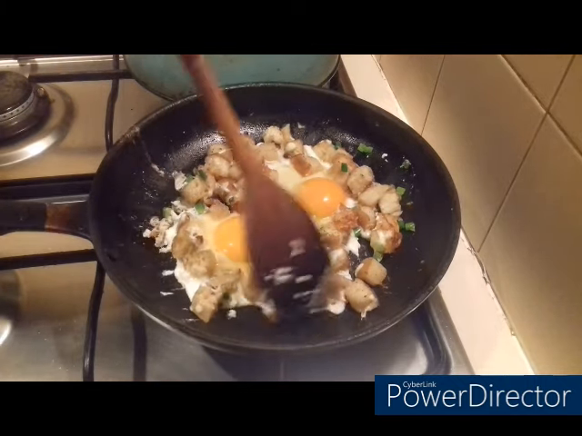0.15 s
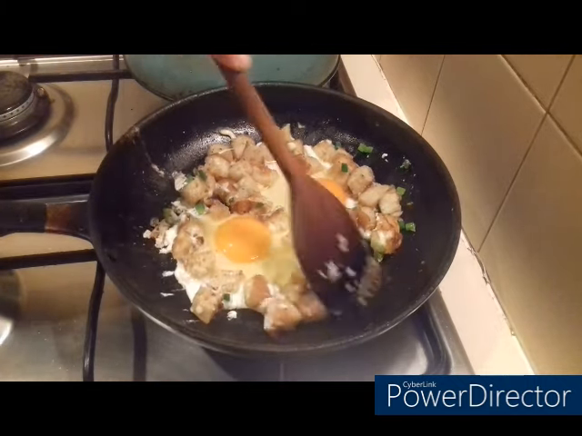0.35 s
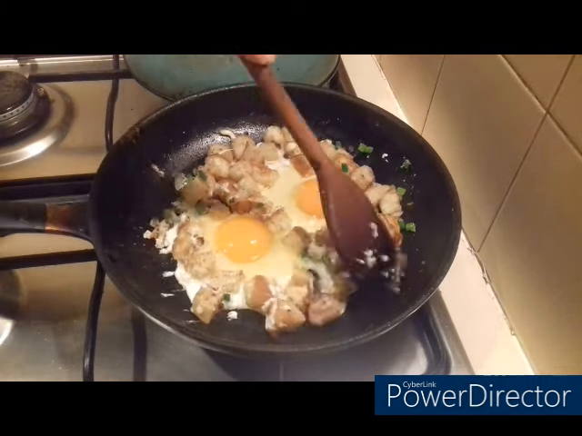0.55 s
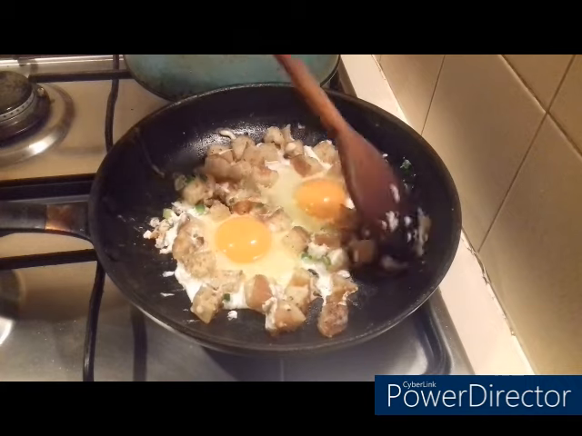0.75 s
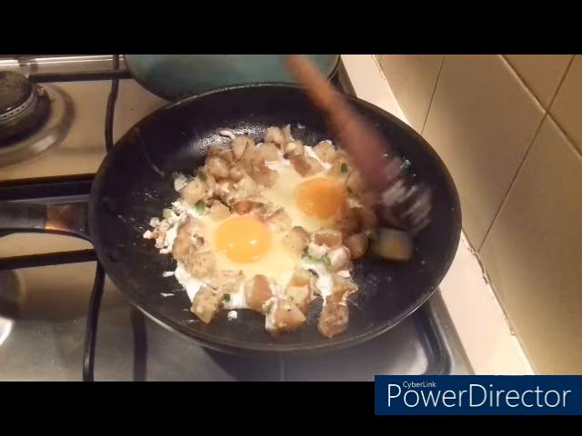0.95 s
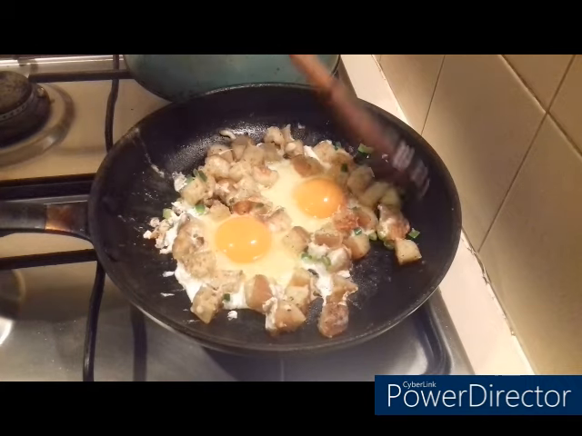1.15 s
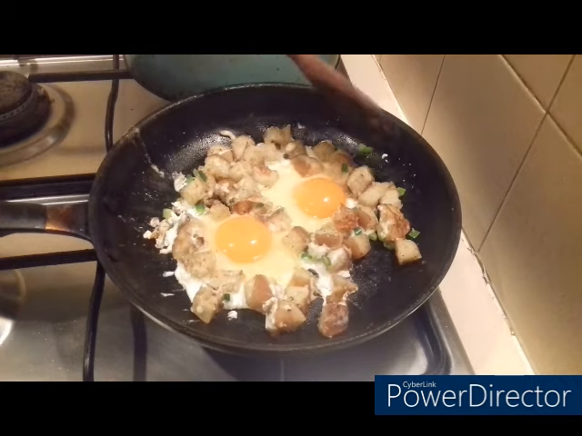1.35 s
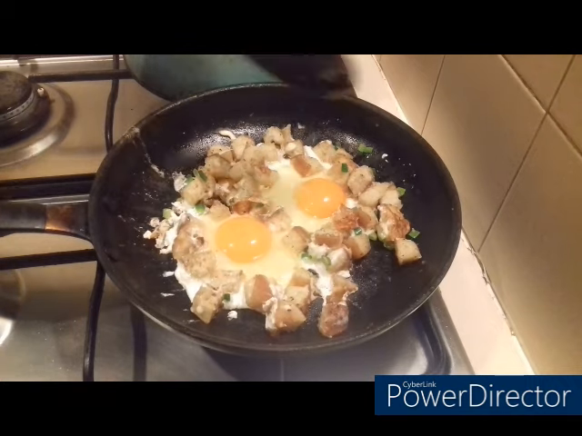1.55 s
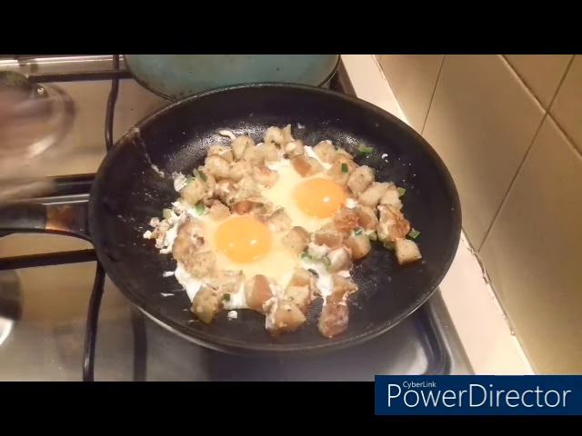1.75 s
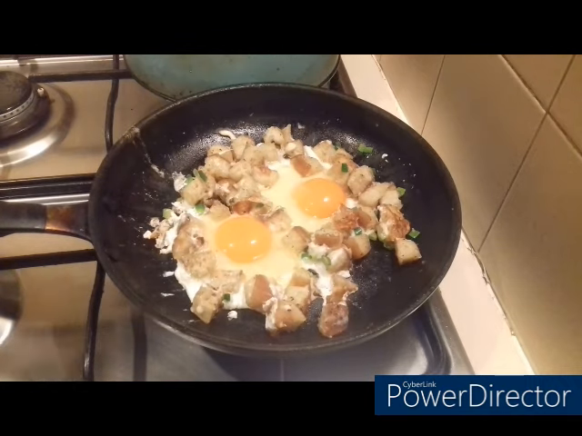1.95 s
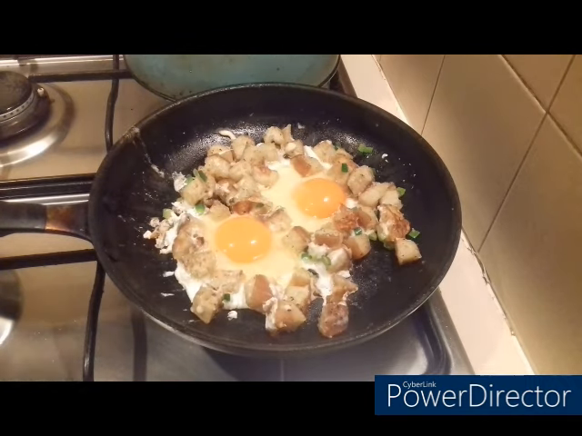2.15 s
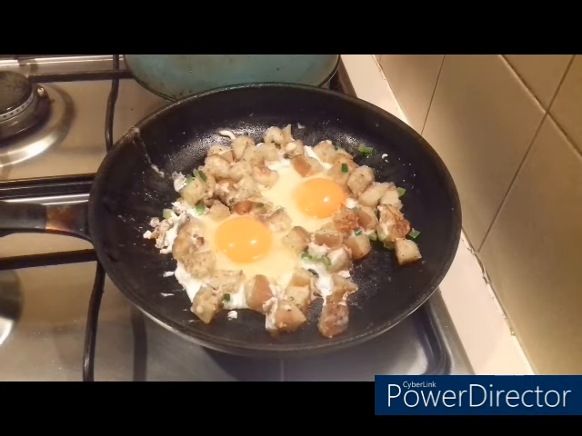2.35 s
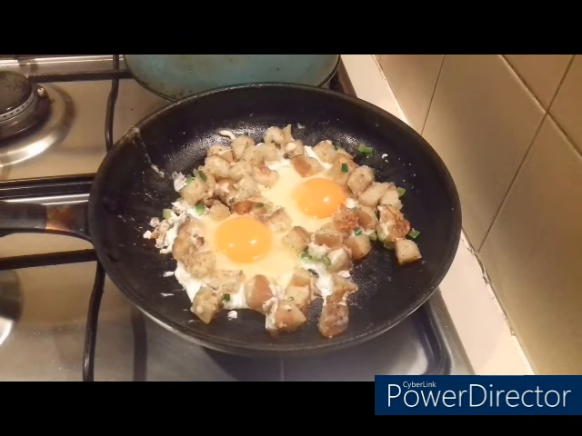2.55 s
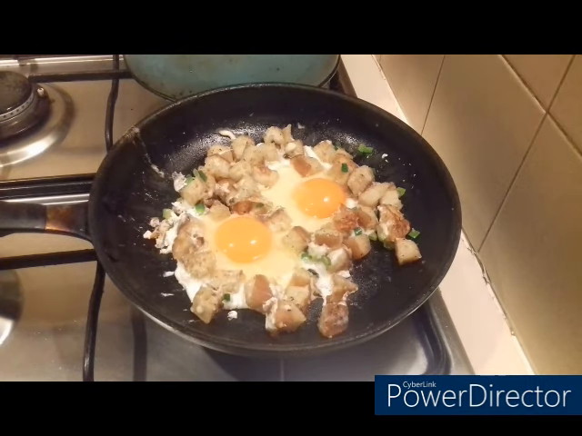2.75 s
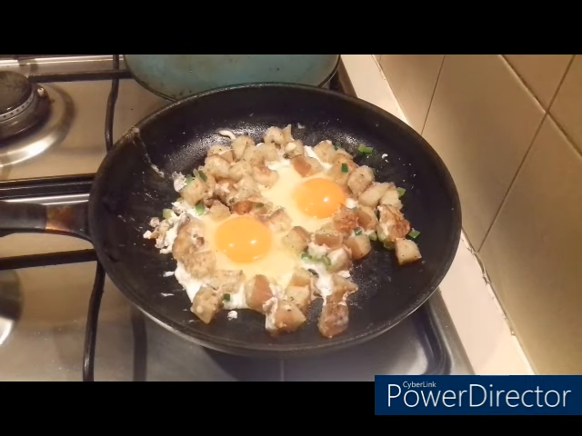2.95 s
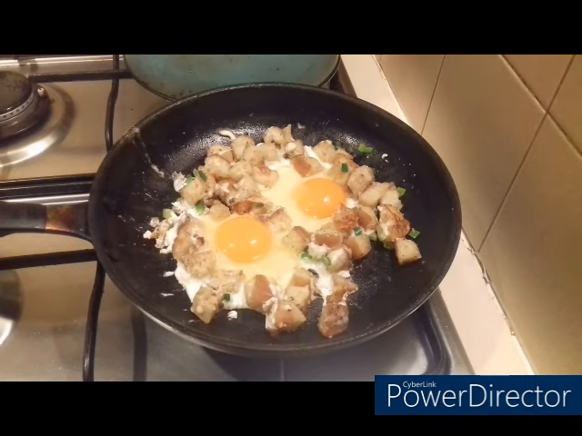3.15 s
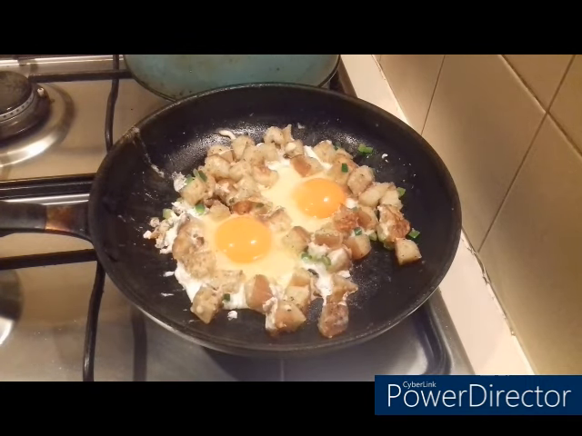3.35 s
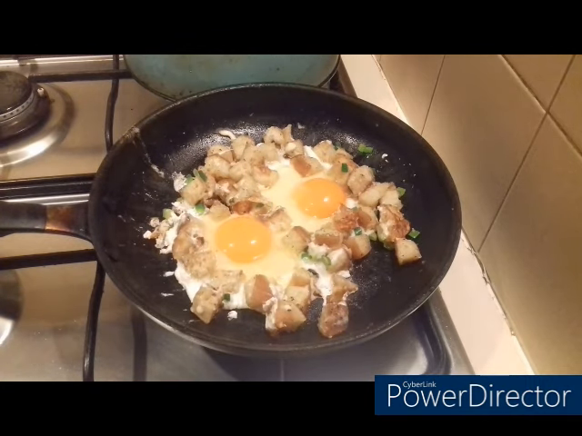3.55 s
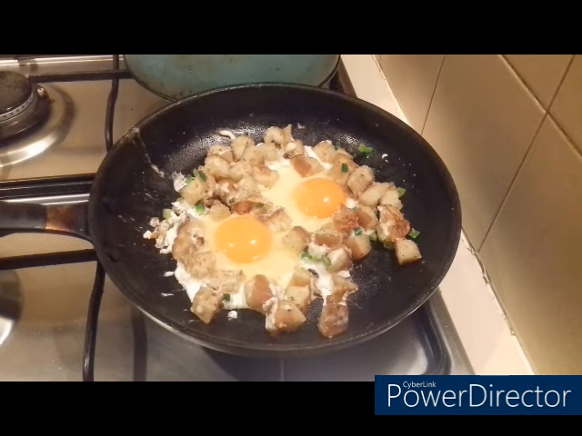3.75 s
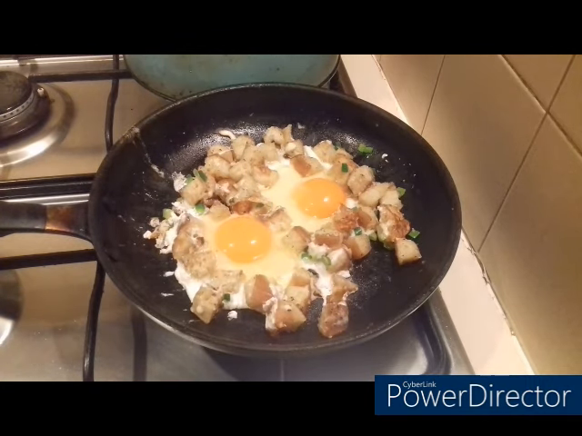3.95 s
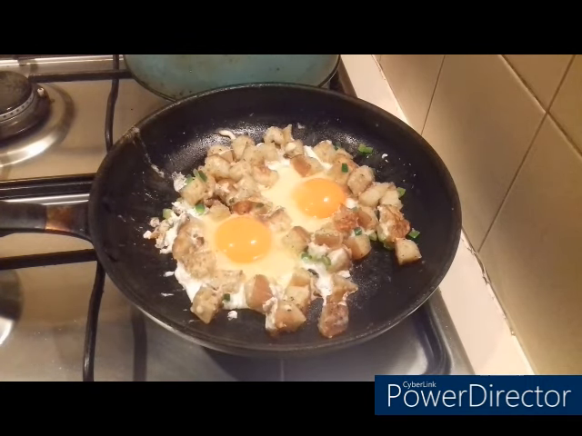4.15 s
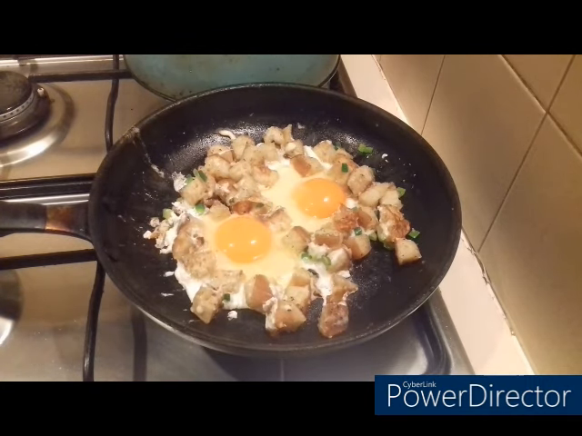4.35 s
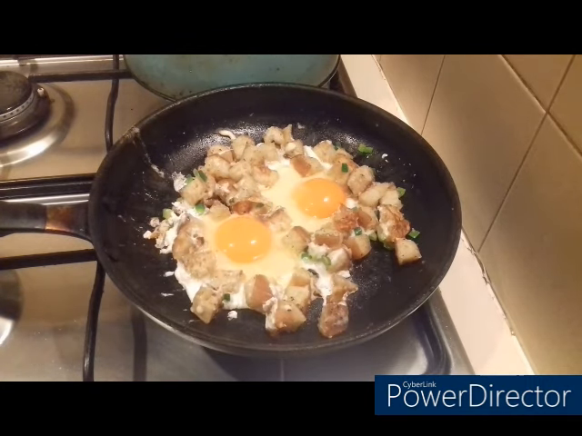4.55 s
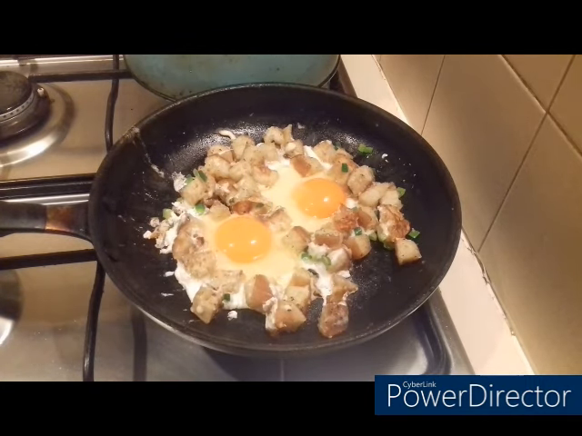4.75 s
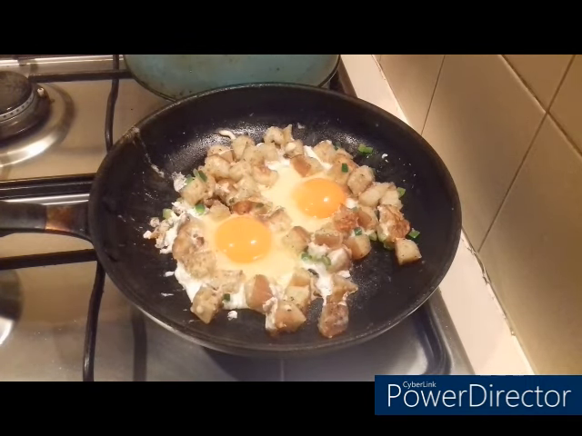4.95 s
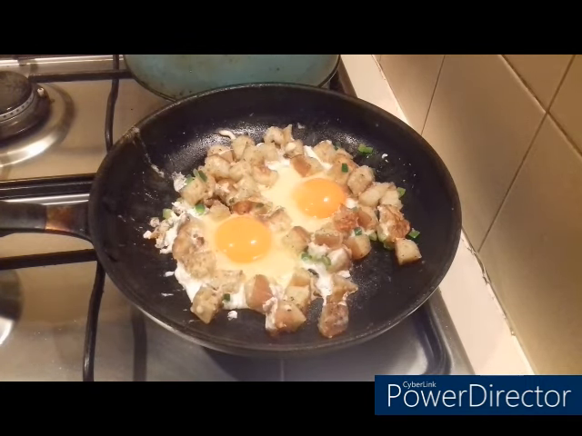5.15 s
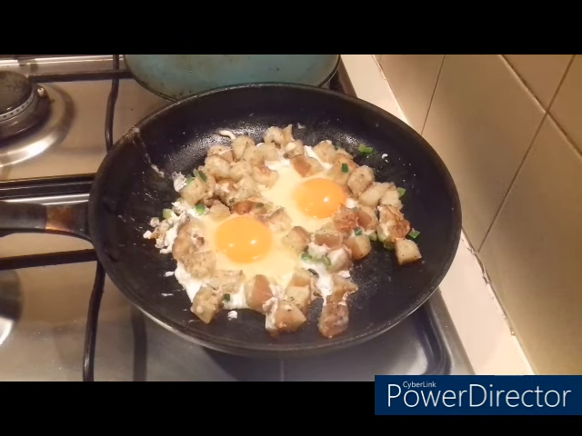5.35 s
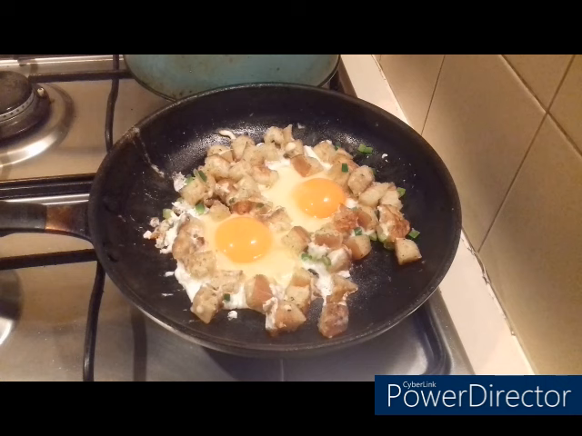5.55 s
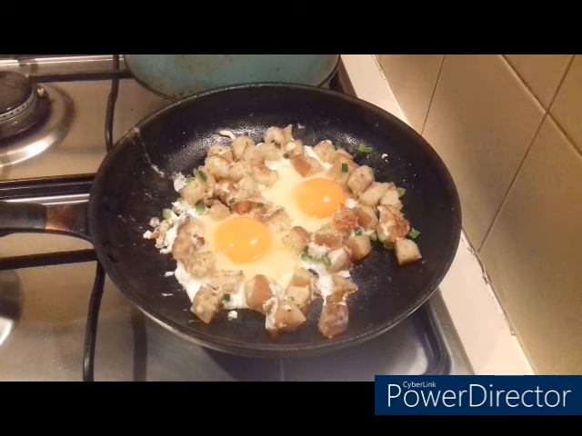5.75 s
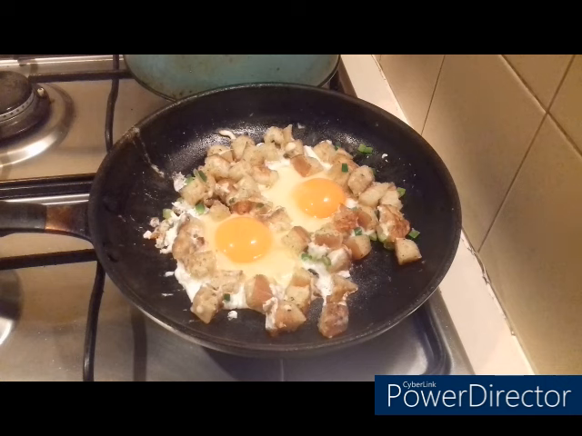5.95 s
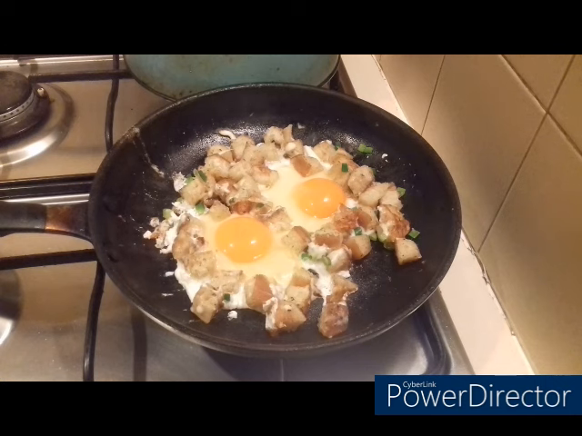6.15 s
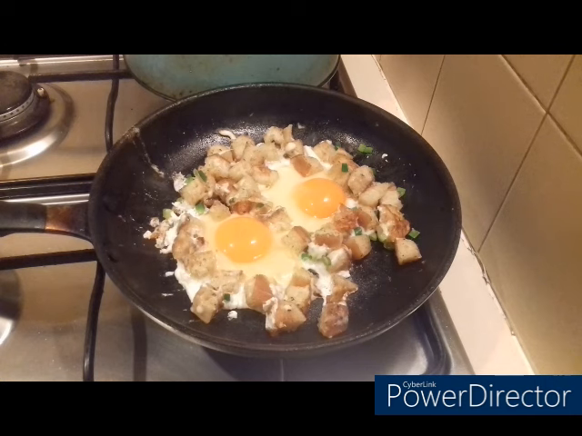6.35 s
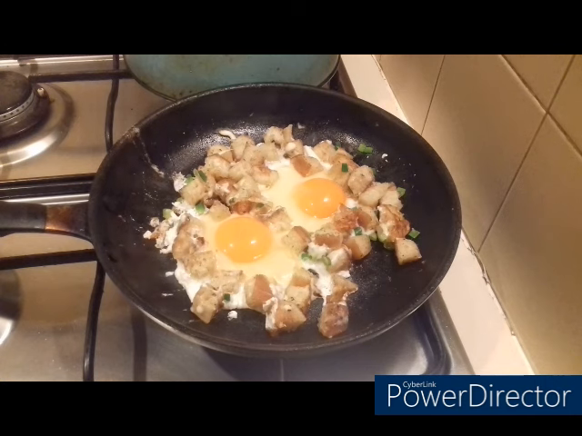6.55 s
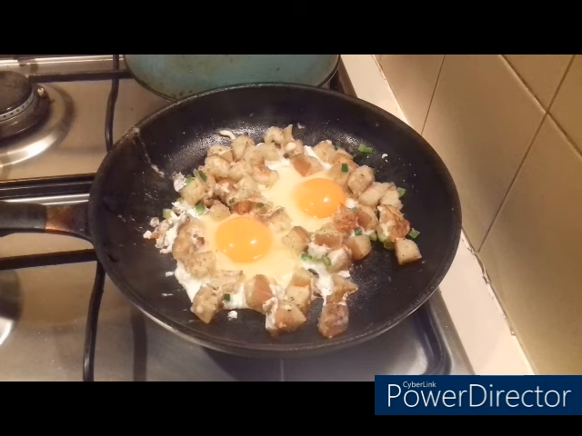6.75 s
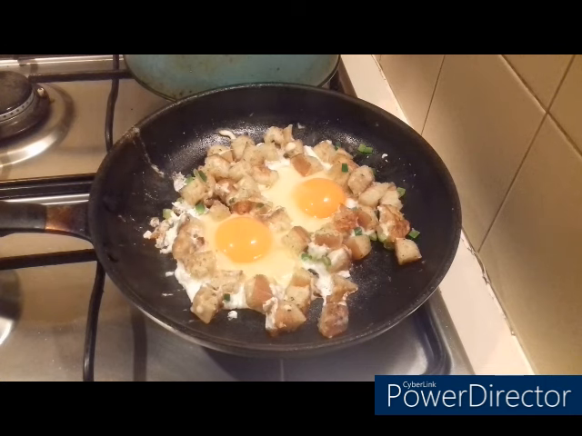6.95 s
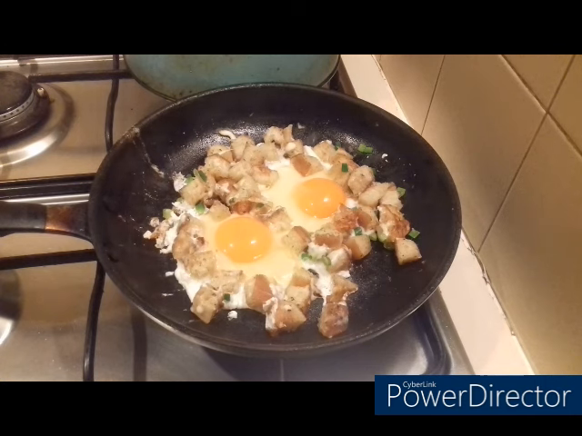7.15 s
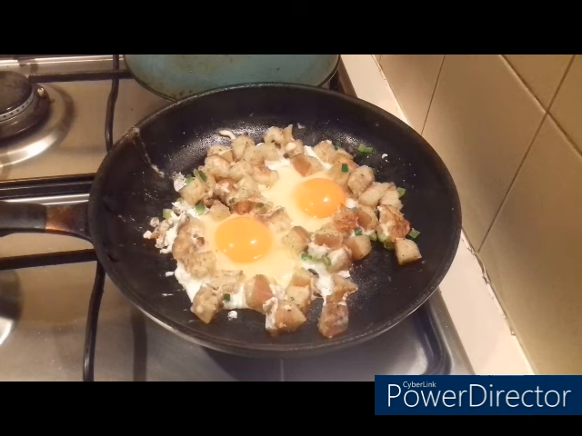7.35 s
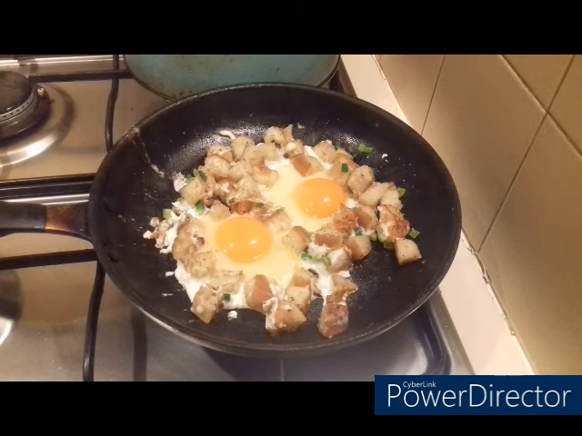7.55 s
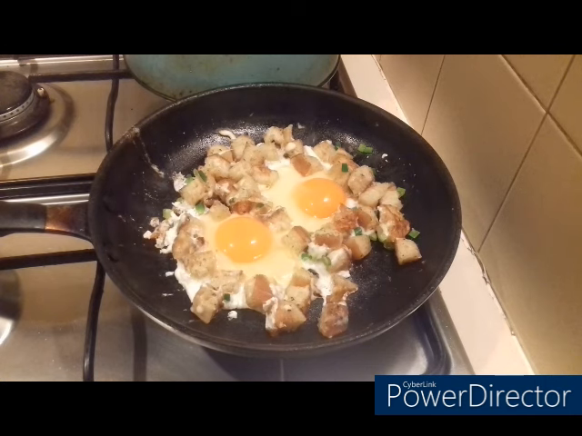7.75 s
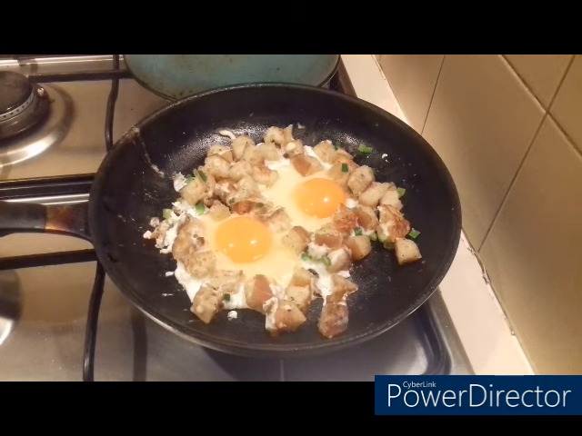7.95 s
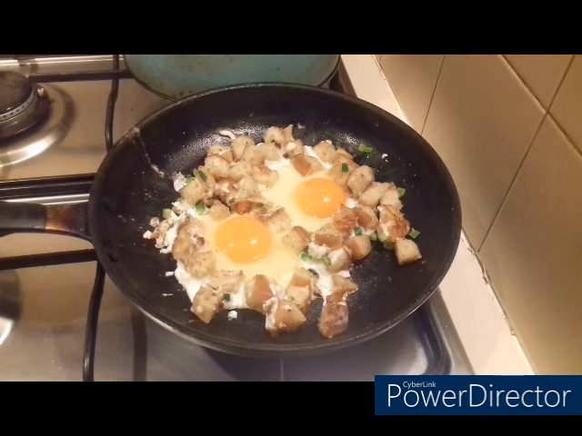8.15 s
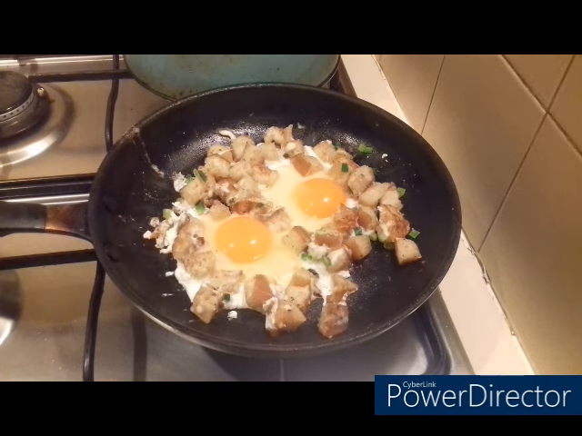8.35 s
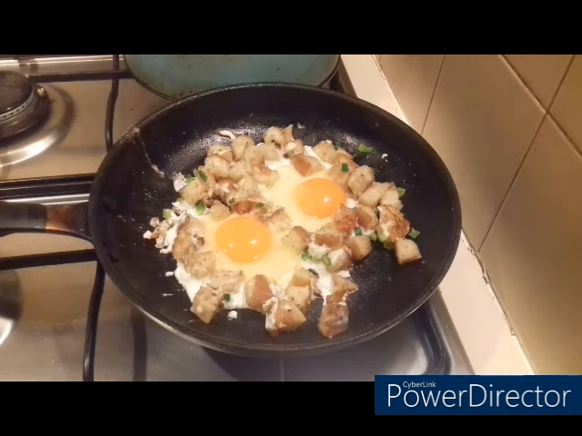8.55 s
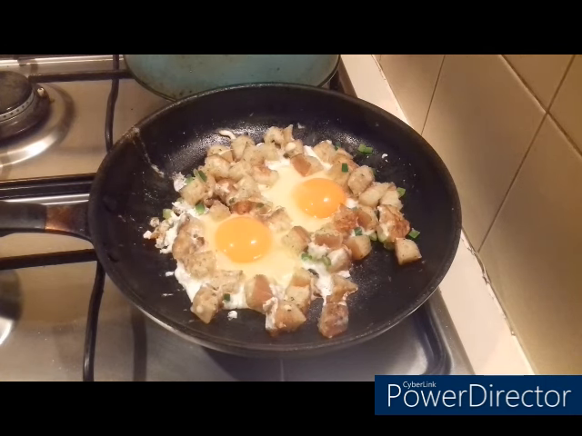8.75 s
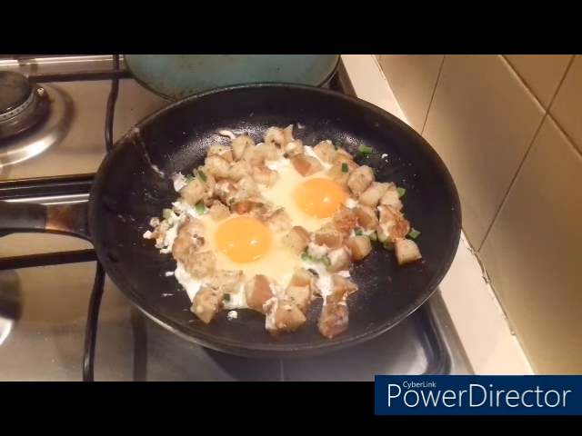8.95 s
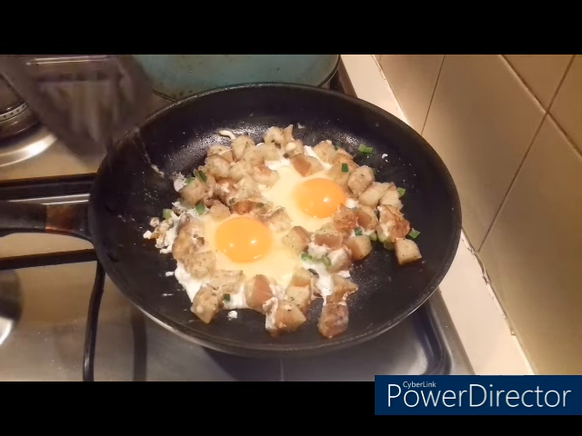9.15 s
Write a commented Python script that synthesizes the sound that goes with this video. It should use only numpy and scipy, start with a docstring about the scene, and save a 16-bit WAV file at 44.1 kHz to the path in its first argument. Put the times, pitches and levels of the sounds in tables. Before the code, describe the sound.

Eggs fry in a pan close to the microphone, giving a constant fine hiss and dense, irregular crackle of bursting bubbles. From 0.06 to about 1.1 s a wooden spatula raps the pan rim in quick, loud clusters roughly every quarter second, with lighter ticks between; the strongest comes near 0.34 s and the last are weaker. From 1.4 to 5.4 s sharp spits of fat pop over the sizzle, thickest around 2.5 to 3.8 s. At 5.65 s a hollow click starts utensil handling: very loud clicks near 5.9 s, short woody drags, then heavier metallic clanks at 6.6, 6.9 and 7.15 s, a click at 7.4 s and a softer rattle around 7.7 to 7.85 s. Sizzling continues alone, with a few spits from 8.6 to 9 s and a faint tick near 9.05 s. Low hum and faint hiss lie underneath; the small hard kitchen adds a short tail.

```python
"""Eggs fry in a pan on a gas hob, close to a small microphone: bursting bubbles crackle over a fine hiss.
In the first second a wooden spatula is knocked clean on the rim, each knock a burst ringing rim or edge.
Loud spits of fat, short noise bursts, follow until about 5.4 s; a few more come after 8.5 s.
From 5.6 s utensils click, ring, drag and rattle beside the hob, made of impacts, resonances and slips.
A small hard-walled kitchen adds a short tail to the knocks; a low hum and a faint hiss stay throughout."""
import sys
import numpy as np
from scipy import signal
from scipy.fft import rfft, irfft
from scipy.io import wavfile
from scipy.ndimage import uniform_filter1d

SR = 44100
rng = np.random.default_rng(int(sys.argv[2]) if len(sys.argv) > 2 else 0)


def output_pcm(signal):
    """Save a mono or channel-first signal as 16-bit PCM at the path in sys.argv[1].

    Samples are clipped to [-1, 1] before scaling.
    """
    pcm = np.clip(np.atleast_2d(signal).T, -1, 1) * 32767
    wavfile.write(sys.argv[1], SR, np.round(pcm).astype(np.int16))


N = 409688

# Every COLOUR is a smooth spectrum: (frequency [Hz], relative density [dB per Hz])
# Every MODES table holds resonances on it: (frequency [Hz], width [Hz], relative density [dB per Hz])

# Frying without the loud spits: (time [s], level [dB])
FRYING_LEVEL = [(0.0, -44), (0.6, -46), (2.1, -46), (2.51, -43.5), (2.85, -45.5), (3.52, -44.5),
                (4.94, -45.5), (5.46, -44), (5.92, -46.5), (6.65, -45.5), (7.5, -46.5), (9.29, -47.5)]
# Frying as the pan and microphone pass it on: (frequency [Hz], relative density [dB per Hz])
PAN_COLOUR = [(410, -42), (700, -13.5), (874, -10), (957, 1), (1210, -12), (1740, -4.5), (1890, -12.5),
              (2290, -6.5), (2420, -3.5), (4340, 0.5), (5490, -10.5), (7230, -15), (10000, -26),
              (11900, -23.5), (15800, -29)]
# Pan and microphone resonances: (frequency [Hz], width [Hz], relative density [dB per Hz])
PAN_MODES = [(970, 31, -11), (1912, 90, 9), (2114, 170, 7.5), (2427, 27, 11.5), (2730, 30, -16),
             (3740, 62, 14), (4150, 81, 11.5), (4450, 17, 17)]
# Loud spits of fat: (time [s], peak level [dB], centre frequency [Hz])
SPITS = [(1.4265, -27.5, 3250), (1.574, -35, 4200), (1.6405, -26, 4760), (1.7442, -26.5, 3650),
         (1.7787, -31, 3200), (1.815, -31.5, 3290), (2.214, -31.5, 3950), (2.311, -32, 3030),
         (2.4634, -24.5, 4800), (2.5551, -26, 4150), (2.593, -30.5, 4180), (2.744, -30, 3670),
         (2.76, -30, 2500), (2.783, -27.5, 2580), (2.9178, -30.5, 3370), (2.984, -31.5, 3260),
         (3.016, -30.5, 4250), (3.0892, -28, 3810), (3.121, -30.5, 2000), (3.182, -30.5, 4450),
         (3.2958, -25, 3860), (3.37, -29, 3670), (3.486, -32, 3020), (3.576, -31, 3070), (3.648, -29, 2880),
         (3.795, -28, 4050), (4.069, -24.5, 2900), (4.297, -27, 4190), (4.564, -30, 3560),
         (4.788, -31, 4000), (4.994, -36, 3000), (5.122, -30, 4500), (5.352, -32, 4420),
         (5.408, -27.5, 4530), (8.5739, -30.5, 2770), (8.619, -28.5, 4130), (8.694, -29.5, 3630),
         (8.9825, -32.5, 4200)]
# Centres of the bubble snaps, small bubbles higher than large ones: (frequency [Hz], ...)
BUBBLES_HZ = (1830, 2860, 4050, 6130, 7900)
# Low hum of the kitchen: (frequency [Hz], relative density [dB per Hz])
HUM_COLOUR = [(25, -25), (50, -17.5), (80, -2.5), (130, 6.5), (200, 1.5), (470, 1.5), (720, -3),
              (960, -3.5), (1300, -32), (3000, -64)]
# Faint hiss that differs between channels: (frequency [Hz], relative density [dB per Hz])
HISS_COLOUR = [(59, -41), (100, -14), (2300, -24), (3030, -38), (4070, -83), (5140, -35), (10100, -27.5),
               (15800, -31)]

# All blows: (time [s], loudest 4 ms in the 1.5-5.5 kHz band [dB], extra body [dB], extra treble [dB],
#             fade to 1/e of the force [s])
# Spatula on the pan rim, columns as for all blows
SPATULA = [(0.0591, -25.5, -6, -9, 0.015), (0.0842, -22.5, -1, 2, 0.011), (0.3276, -22, -3, 3, 0.0076),
           (0.34, -15, -3.5, -4, 0.0031), (0.3524, -21.5, -1.5, 5, 0.021), (0.5911, -20.5, 0.5, 3.5, 0.02),
           (0.6109, -26.5, 4, 7, 0.017), (0.6535, -30, -14, 11.5, 0.017), (0.857, -31.5, 5.5, 10, 0.0091),
           (0.8739, -30, 4, -17, 0.014), (1.0968, -37.5, 5.5, -1, 0.02)]
# Blade ticking back on its edge, columns as for all blows
REBOUNDS = [(0.194, -34, -22, 12, 0.0046), (0.2093, -24.5, 1.5, 3, 0.018), (0.4728, -23.5, 0.5, 1, 0.0099),
            (0.5053, -38, 6, -4, 0.02), (0.7043, -26, 4, -4, 0.0099), (0.7432, -37, -3, -3, 0.004),
            (0.9064, -33, 5.5, -2, 0.015), (0.944, -35, 6.5, -5, 0.0094)]
# Short hard clicks of small utensils, columns as for all blows
UTENSILS = [(5.656, -20.5, 6, -20, 0.0094), (5.8162, -36.5, -0.5, -5, 0.0091),
            (5.9198, -11.5, -11.5, 5, 0.0037), (5.9645, -13.5, -11, -2, 0.004),
            (5.9863, -24.5, -1, -12, 0.0025), (6.2463, -37, -1, 16, 0.005), (6.4049, -39.5, 7, 2, 0.0078),
            (6.484, -38.5, 9.5, 10, 0.015), (7.0968, -37, -10, -9, 0.0052),
            (7.3937, -16.5, 0.5, 1.5, 0.0024), (7.6764, -44, 16.5, -2, 0.017),
            (7.7172, -34, -3, -4, 0.0035), (9.0506, -32.5, -10, 7, 0.0047)]
# Heavier metal utensils rattling together, columns as for all blows
CLANKS = [(6.589, -34, -1, -15, 0.0028), (6.614, -36, -2, 0, 0.004), (6.6211, -13.5, 0.5, 2.5, 0.01),
          (6.8662, -12, -0.5, 0.5, 0.012), (7.1432, -14, -6.5, -7, 0.0061), (7.1884, -22.5, 5, 1, 0.0062),
          (7.7531, -22, -1.5, 1, 0.0074), (7.7929, -28.5, -6.5, -4, 0.0019), (7.8476, -34, -6, -7, 0.0034)]
# Bodies set ringing by the blows, columns as for every COLOUR and MODES
RIM_COLOUR = [(35, -57.5), (60, -26), (255, -3.5), (537, -10), (780, -2), (1240, -4.5), (1940, -10.5),
              (2620, -15), (4590, -14), (5400, -30), (15800, -56)]
RIM_MODES = [(257, 31, 0.5), (390, 91, -3.5), (481, 12, -7), (773, 68, 7.5), (976, 140, 4.5),
             (1260, 43, -16), (1560, 150, -16), (1904, 110, -4.5), (3140, 300, -9.5), (3300, 40, -20),
             (4450, 160, -24), (4960, 330, -44)]
EDGE_COLOUR = [(60, -44), (300, -9), (700, -35), (1500, -10), (2600, -22.5), (4000, -12), (5200, -22.5),
               (15800, -66.5)]
EDGE_MODES = [(990, 270, 3), (1450, 210, -5.5), (2074, 300, 10), (3210, 570, 8), (4450, 210, 6)]
CLICK_COLOUR = [(60, -30), (314, -33.5), (745, -35.5), (1720, -16.5), (3000, 0.5), (4200, 0), (5300, -9.5),
                (7000, -16), (10000, -46), (15800, -54)]
CLICK_MODES = [(370, 90, -17), (2000, 400, -12), (3400, 500, -4), (4200, 400, 0)]
TOOL_COLOUR = [(60, -40), (300, -16), (490, -5), (900, -37), (1500, -21), (4300, -13.5), (5600, -25),
               (8000, -16.5), (10000, -27), (13000, -23), (15800, -30)]
TOOL_MODES = [(485, 80, -2), (880, 80, -3), (1000, 80, -7), (1314, 80, -9), (1825, 130, -9),
              (2430, 130, -7), (2870, 150, -8), (3140, 150, -8), (3380, 130, -8), (3844, 150, -7),
              (4180, 130, -4), (4355, 130, -4)]
# Borders between the low, middle, high and top bands of a blow: (frequency [Hz], ...)
BAND_EDGES_HZ = (600, 1500, 5500)
# Usual balance of a blow against its high band:
# (low band [dB], middle band [dB], top band [dB], thud of the worktop [dB])
SPATULA_BALANCE = (0, -0.5, -24, -14.5)
REBOUND_BALANCE = (-11.5, -3, -11.5, -22)
UTENSIL_BALANCE = (-20.5, -11, -16.5, -29.5)
CLANK_BALANCE = (-10.5, -9.5, -22.5, -31.5)

# Decay of the room tail by band: (centre frequency [Hz], t60 [s])
KITCHEN_DECAY = [(100, 1), (500, 0.46), (2000, 0.24), (6000, 0.29), (14000, 0.17)]
# Single resonances, hollow tocks to long metal rings: (time [s], level [dB], frequency [Hz], t60 [s])
TOCKS = [(5.656, -5, 3435, 0.015), (5.92, -4, 4120, 0.029), (6.405, -25.5, 1790, 0.04),
         (6.625, -17, 889, 0.12), (6.628, -38, 6200, 0.2), (6.630, -26.5, 1950, 0.21),
         (6.872, -41, 6400, 0.31), (6.875, -26, 1960, 0.19), (7.150, -15.5, 2268, 0.087),
         (7.394, -25, 1520, 0.049), (7.694, -8.5, 610, 0.015), (7.693, -24, 2320, 0.027),
         (7.755, -16, 1896, 0.041), (9.099, -28.5, 1820, 0.025), (9.111, -24.5, 1570, 0.02)]
# Something dragged over wood: (start [s], length [s], rumble frequency [Hz], rumble [dB], scrape [dB])
STROKES = [(5.91, 0.12, 352, -45, -45), (6.08, 0.17, 315, -49, -45.5), (6.39, 0.037, 400, -53, -36.5),
           (6.487, 0.015, 396, -55, -49.5), (6.753, 0.08, 800, -44, -47), (6.897, 0.44, 554, -50, -53.5),
           (7.66, 0.15, 394, -52.5, -50)]

SPIT_FADE_S = 0.0043
HUM_DB, HISS_DB, KITCHEN_DB = -60, -71.5, -14.5
WORKTOP_HZ, WORKTOP_T60_S = 90.8, 0.29  # low thud under every blow
STROKE_ATTACK_S, STROKE_FADE_DB_PER_S = 0.015, 121
TOP_HZ = 15900


def undb(db):
    """Gain of a level in dB."""
    return 10 ** (np.asarray(db) / 20)


def level(x, db):
    """Scale to an rms level in dB."""
    return x * undb(db) / np.sqrt(np.mean(x ** 2))


def curve(table, column):
    """One column of a time table at every sample."""
    rows = np.array(table)
    return np.interp(np.arange(N) / SR, rows[:, 0], rows[:, column])


def response(colour, modes=(), between_db=0., size=8192):
    """Causal, minimum-phase impulse response of a smooth spectrum with resonances standing on it."""
    hz = np.maximum(np.arange(size // 2 + 1) * SR / size, 1)
    rows = np.array(colour)
    smooth_db = np.interp(np.log(hz), np.log(rows[:, 0]), rows[:, 1]) + between_db
    power = undb(2 * smooth_db)
    for centre, width, db in modes:
        power = power + undb(2 * db) / (1 + (2 * (hz - centre) / width) ** 2) ** 2
    # folding the cepstrum forward in time makes the response causal
    cepstrum = irfft(np.log(power) / 2)
    cepstrum[1:size // 2] *= 2
    cepstrum[size // 2 + 1:] = 0
    return irfft(np.exp(rfft(cepstrum)))[:size // 2]


def band(x, lo_hz, hi_hz):
    """Steep band-pass."""
    sos = signal.butter(4, [lo_hz, hi_hz], "bandpass", fs=SR, output="sos")
    return signal.sosfilt(sos, x)


def walk(rate):
    """Random levels held 1 / rate s and slewed twice; spread 1."""
    hold = int(SR / rate)
    steps = np.repeat(rng.standard_normal(N // hold + 1), hold)
    slewed = uniform_filter1d(uniform_filter1d(steps, hold), hold)[:N]
    return slewed / slewed.std()


def clicks(size, rate, scatter_db):
    """Random tiny impacts at a mean rate per second, a few larger than the rest."""
    hit = rng.random(size) < rate / SR
    sign = rng.choice([-1, 1], size)
    strength = np.minimum(rng.exponential(size=size), 4)
    return hit * sign * undb(scatter_db * strength)


def add(out, s, x):
    """Mix a sound in at time s."""
    start = int(s * SR)
    out[start:start + len(x)] += x[:N - start]


def fat_spits(pan):
    """Spits of fat: decaying noise bursts, strongest around their own pitch, heard through the pan."""
    out, t = np.zeros(N), np.arange(SR // 20) / SR
    for s, db, hz in SPITS:
        burst = rng.standard_normal(len(t)) * np.exp(-t / SPIT_FADE_S)
        pitched = band(burst, hz / 2.16, hz * 1.68)
        spit = np.convolve(burst + pitched, pan[:400])
        add(out, s, spit * undb(db) / np.abs(spit).max())
    return out


def frying():
    """Steam bubbles burst in the fat: fine fizz, a dense crackle in quick flurries, and the loudest spits."""
    fine = level(clicks(N, 6000, 0.9), 0)
    flurry = undb(2.5 * walk(45))
    # a droplet splutters: a sharp start, then a few milliseconds of noise
    droplets = np.abs(clicks(N, 60, 4))
    splutter = signal.lfilter([1], [1, -np.exp(-1 / (.003 * SR))], droplets)
    snaps = level(clicks(N, 120, 2.4) * flurry, -10.5)
    snaps += level(splutter * rng.standard_normal(N), -7.0)
    for hz in BUBBLES_HZ:
        bubbles = band(clicks(N, 260, 1.6) * flurry, hz / 1.327, hz * 1.253)
        snaps += level(bubbles, -2 + 10 * np.log10(hz / SR))
    pan = response(PAN_COLOUR, PAN_MODES, between_db=9.0)
    crackle = level(signal.fftconvolve(fine + snaps, pan)[:N], 0)
    return crackle * undb(curve(FRYING_LEVEL, 1)) + fat_spits(pan)


def steady(colour, db):
    """Smooth noise of a given colour."""
    return level(signal.fftconvolve(rng.standard_normal(N), response(colour))[:N], db)


def hum():
    """The low steady hum of the kitchen: noise concentrated in the bass."""
    return steady(HUM_COLOUR, HUM_DB)


def faint_hiss():
    """Faint coloured noise, the only part that differs between the channels."""
    return steady(HISS_COLOUR, HISS_DB)


def blows(table, body, balance, first, rise_s, chatter_s):
    """Blows land, chatter, fade and ring a body; weight brings out the low end, sharpness the treble."""
    out, t = np.zeros(N), np.arange(SR // 3) / SR
    edges = (40, *BAND_EDGES_HZ, 17000)
    thud_fade = undb(-60 * t / WORKTOP_T60_S) * np.minimum(t / 0.0097, 1)
    for s, high_db, weight, edge, fade in table:
        low_db = high_db + weight + balance[0]
        mid_db = high_db + weight + balance[1]
        top_db = high_db + edge + balance[2]
        force = clicks(len(t), 6000, 0.42) + 0.16 * rng.standard_normal(len(t))
        force *= np.minimum(t / rise_s, 1)
        force[0] = first  # first contact
        force *= np.exp(-np.maximum(t - chatter_s, 0) / max(fade, .0005))
        ring = signal.fftconvolve(force, body)[:len(t)]
        for lo, hi, db in zip(edges, edges[1:], (low_db, mid_db, high_db, top_db)):
            part = band(ring, lo, hi)
            loudest = uniform_filter1d(part ** 2, size=180).max() ** .5
            add(out, s, part * undb(db) / loudest)
        thud = band(rng.standard_normal(len(t)), WORKTOP_HZ / 1.16, WORKTOP_HZ * 1.38)
        add(out, s, level(thud, high_db + weight + balance[3]) * thud_fade)
    return out


def spatula_knocks():
    """The wooden spatula strikes the pan and sets the rim ringing."""
    rim = response(RIM_COLOUR, RIM_MODES, between_db=-2.5)
    return blows(SPATULA, rim, SPATULA_BALANCE, first=4.4, rise_s=0.0017, chatter_s=0.0039)


def spatula_rebounds():
    """The blade ticks back on its edge, with a sharp contact and little chatter."""
    blade = response(EDGE_COLOUR, EDGE_MODES)
    return blows(REBOUNDS, blade, REBOUND_BALANCE, first=5.0, rise_s=0.00022, chatter_s=0.0019)


def kitchen():
    """Tail of the room: bands of noise, each dying in its own time, the bass slowest."""
    t, tail = np.arange(SR // 2) / SR, 0
    for hz, t60 in KITCHEN_DECAY:
        noise = band(rng.standard_normal(len(t)), hz / 2, min(hz * 2, 19000))
        tail = tail + noise * undb(-60 * t / t60)
    tail *= np.minimum(t / 0.0064, 1)
    return tail * undb(KITCHEN_DB) / np.sqrt(np.sum(tail ** 2))


def utensil_clicks():
    """Small utensils make hard contacts that chatter only about a millisecond before fading."""
    small_tool = response(CLICK_COLOUR, CLICK_MODES, between_db=-1.5)
    return blows(UTENSILS, small_tool, UTENSIL_BALANCE, first=3.0, rise_s=0.00051, chatter_s=0.0011)


def tocks():
    """One damped resonance each, pushed softly; rattling contact makes the ring waver."""
    out, t = np.zeros(N), np.arange(SR // 2) / SR
    for s, db, hz, t60 in TOCKS:
        waver = uniform_filter1d(rng.standard_normal(len(t)), size=300) * 4.8
        ring = np.sin(2 * np.pi * hz * t + waver) * (1 + waver)
        fade = undb(db - 60 * t / t60) * np.minimum(t / 0.0013, 1)
        add(out, s, ring * fade)
    return band(out, 300, 17000)


def drag():
    """Uneven stick-slip clicks: low wooden rumble and dry, grainy scrape; strokes set in, hold and die."""
    slips = clicks(N, 1500, 2.0) * undb(1.2 * walk(60))
    scrape = band(slips, 700, 2300) + .6 * band(slips, 2300, 4800) + .12 * band(slips, 4800, 8000)
    scrape = level(scrape, 0)
    out, t = np.zeros(N), np.arange(N) / SR
    for s, length, hz, rumble_db, scrape_db in STROKES:
        rumble = level(band(slips, hz / 1.61, hz * 1.535), 0)
        attack = np.clip((t - s) / STROKE_ATTACK_S, 0, 1)
        fade = undb(-STROKE_FADE_DB_PER_S * np.maximum(t - s - length, 0))
        out += attack * fade * (rumble * undb(rumble_db) + scrape * undb(scrape_db))
    return out


def utensil_clanks():
    """Heavier metal utensils rattle together, chattering longer than the small ones."""
    heavy_tool = response(TOOL_COLOUR, TOOL_MODES, between_db=3.0)
    return blows(CLANKS, heavy_tool, CLANK_BALANCE, first=2.6, rise_s=0.0019, chatter_s=0.0073)


def scene():
    """All sources reach both channels alike; only a faint hiss differs between them."""
    knocks = spatula_knocks() + spatula_rebounds()
    knocks += utensil_clicks() + tocks() + drag() + utensil_clanks()
    room = signal.fftconvolve(knocks, kitchen())[:N]
    mid = frying() + hum() + knocks + room
    side = faint_hiss()
    return np.array([mid + side, mid - side])


def record(dry):
    """The recorder stops at full scale and cuts the top."""
    top_cut = signal.ellip(10, .2, 90, TOP_HZ, fs=SR, output="sos")
    return signal.sosfilt(top_cut, np.clip(dry, -1, 1))


dry = scene()
out = record(dry)
output_pcm(out)
```